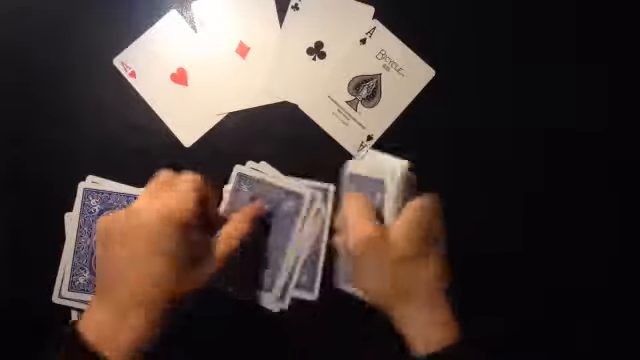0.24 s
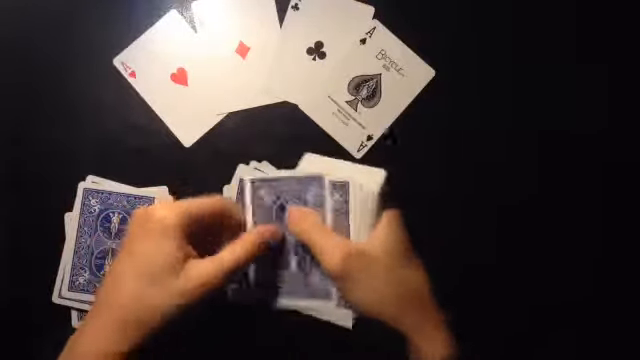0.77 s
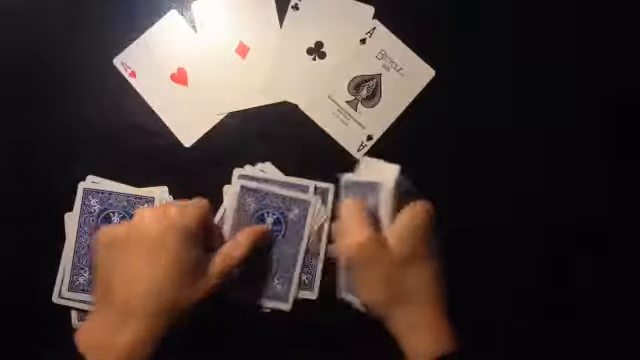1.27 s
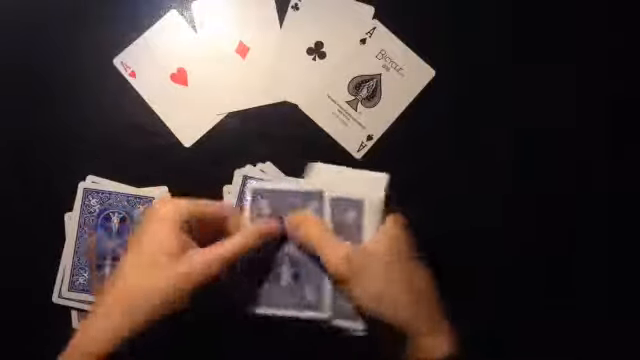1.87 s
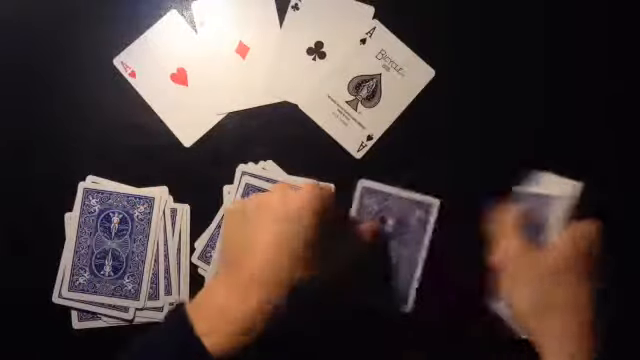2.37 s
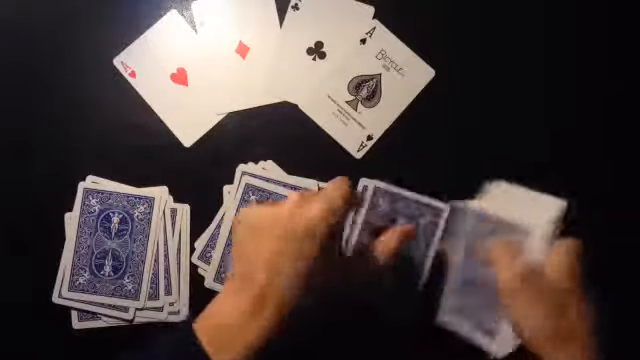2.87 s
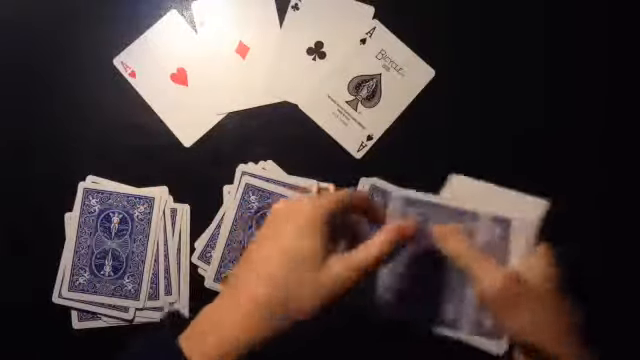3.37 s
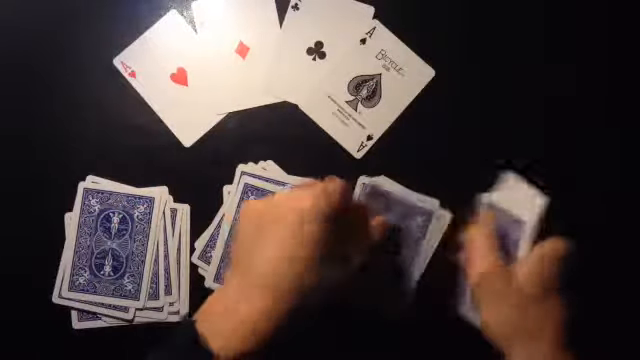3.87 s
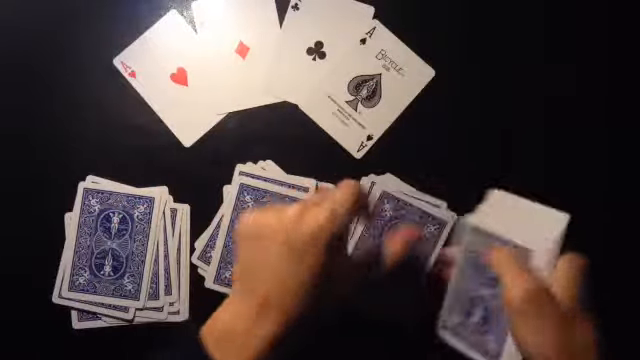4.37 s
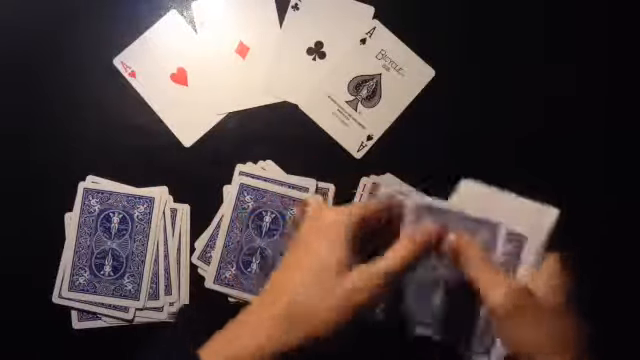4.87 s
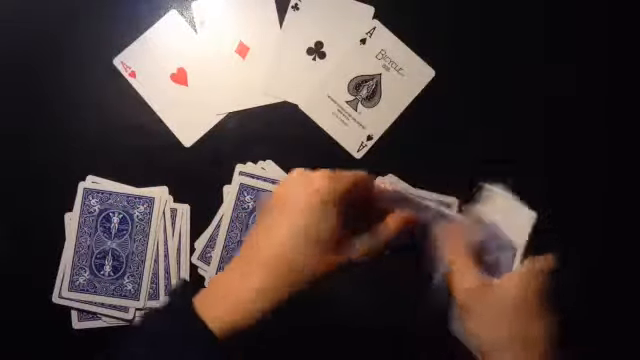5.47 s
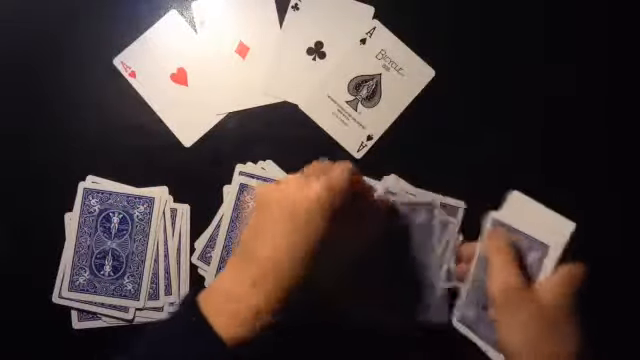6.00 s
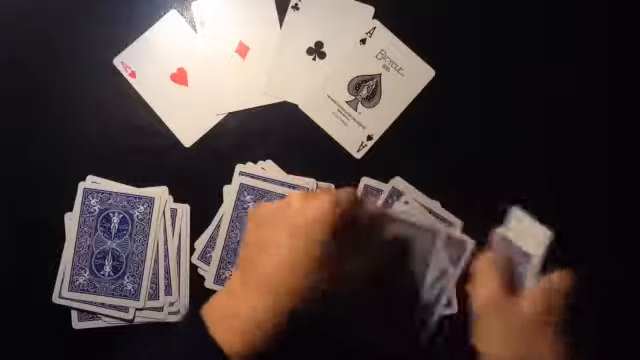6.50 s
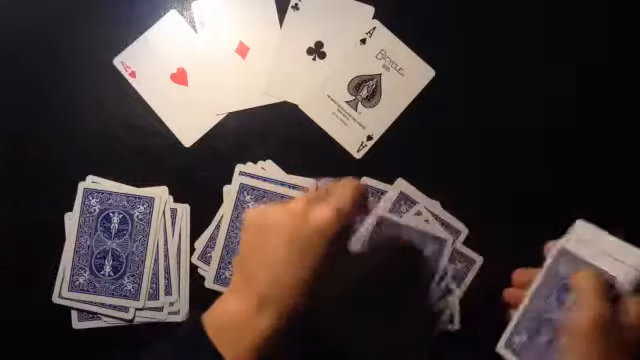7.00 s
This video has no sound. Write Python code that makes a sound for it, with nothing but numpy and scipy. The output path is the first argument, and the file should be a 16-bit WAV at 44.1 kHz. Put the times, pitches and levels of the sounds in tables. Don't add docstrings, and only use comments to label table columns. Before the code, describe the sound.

Playing cards are dealt one after another at a brisk, steady pace, each snapping sharply off the deck and landing with a soft low thump.

```python
import sys
import numpy as np
from scipy import signal
from scipy.fft import rfft, irfft, next_fast_len
from scipy.io import wavfile
from scipy.ndimage import uniform_filter1d

SR = 44100
rng = np.random.default_rng(int(sys.argv[2]) if len(sys.argv) > 2 else 0)


def unload_wav(signal):
    wavfile.write(
        sys.argv[1],
        SR,
        np.round(np.clip(np.atleast_2d(signal).T, -1, 1) * 32767).astype(np.int16),
    )


def invert_db(x):
    u = np.asarray(x, float) / 20
    return 10 ** u


N = 319725
LEAD = 12288
SPAN = 2048

# start_s, peak_db, card_hz, crack_db, room_db
SNAPS = [(0.2264, 4.5, 2360, -35.5, -20.5), (0.5831, -8, 2330, -9, -18), (0.9603, -2.5, 2720, -23.5, -27.5),
         (1.323, 0.5, 2290, -15.5, -19), (1.6778, 0.5, 2770, -34, -19), (2.0204, -17, 3500, -1, -21),
         (2.411, -9.5, 2350, -41, -19), (2.7982, 0, 2157, -28, -19.5), (3.1687, -20.5, 2170, -5.5, -26),
         (3.58, -6.5, 2360, -0.5, -21), (3.9405, -2, 2340, -40.5, -22), (4.3185, -16.5, 1830, -7, -30),
         (4.6996, -2, 2350, -40, -25.5), (5.1043, -10, 2120, -5.5, -25.5),
         (5.5737, -3.5, 2840, -0.5, -26.5), (6.0789, -8, 3500, 3, -25), (6.556, -2, 2660, -3, -20.5),
         (6.9603, -7.5, 2680, -8, -18)]
# peak_db, card_hz, crack_db, room_db
EARLIER_SNAP = (2, 2095.5, -29, -17)
EARLIER_SNAP_S = -0.14
# bend_hz, level_db, width_share
SECOND_BENDS = [(3500, -13.5, 0.42), (3500, -3.5, .3), (3300, -3, 0.33), (3200, -5.5, 0.26),
                (3050, -0.5, 0.38), (3670, 1, 0.17), (2010, -24, 0.13), (3250, 2, 0.54), (4260, -22, 0.12),
                (1590, 2, 0.22), (3790, -5.5, 0.59), (3130, -15, 0.42), (2580, -40, 0.63),
                (1240, -26, 0.22), (4520, -31, 0.25), (4130, -2, 0.92), (2830, 2.5, 0.354), (3470, -4, 0.2),
                (3130, -7, 0.024)]
# length_share, drag_db, second_blow_delay_s, second_blow_db
RELEASES = [(.8, -17, .005, -9), (0.77, -18.5, 0.006, -11.5), (0.44, -6.5, 0.0033, -5),
            (0.2, -16, 0.0048, -11), (0.57, -10.5, 0.004, -8), (0.9, -9.5, .004, -10.5),
            (0.38, -1, 0.0036, 4.5), (0.7, 0.5, 0.0054, -4.5), (0.56, -20, 0.0043, -4.5),
            (0.43, -12, 0.0072, -22), (0.67, -8.5, .005, -16.5), (0.55, -13, 0.0058, -8),
            (0.62, -24, 0.02, -15.5), (0.69, -16, 0.0034, -9.5), (0.43, -13, 0.0028, -7.5),
            (0.48, -8.5, 0.0044, -14), (0.28, -13, 0.0047, -18), (0.76, -11, 0.0091, -11.5),
            (0.25, -17, .004, -0.5)]
# hump_hz, width_share, second_hz, second_db
TAIL_COLOURS = [(2070.0, 0.3, 3100.0, -18.5), (2240.0, 0.39, 4200, 1.5), (2410.0, 0.36, 3180, -14),
                (2410.0, 0.2, 780, -12.5), (2070.0, 0.42, 3900, -3), (2620, 0.5, 3960.0, 3),
                (1910, 0.4, 3000, 10), (2950, 0.36, 2070.0, 0), (2170, 0.51, 3600, -13.5),
                (1550.0, 0.33, 1800, -5), (2120, 0.27, 3960, -1), (2240.0, 0.47, 3570, -4),
                (1380.0, 0.3, 2580.0, -5.5), (2410.0, 0.4, 4900, -23), (4820.0, 0.3, 2200, -8),
                (2410.0, 0.11, 3500, 5.5), (2580.0, 0.203, 3730, 7), (2410.0, 0.065, 3700, -1.5),
                (2450, 0.073, 3330, 2)]
# freq_hz, t60_s
ROOM_DECAY = [(300, 0.35), (1400, 0.53), (3700, 0.41), (7000, 0.24), (12000, 0.15)]
# start_s, peak_db, pitch_hz, half_length_s
PINGS = [(0.2272, -15.5, 1550, 0.0018), (0.2275, -8.5, 4600, 0.0016), (0.2285, -4, 2695, 0.0014),
         (0.2325, -10.5, 3620, 0.0012), (0.5847, -18, 3350, 0.0014), (0.5852, -24.5, 1380.0, 0.0017),
         (0.5857, -15, 2410.0, 0.0022), (0.9618, -22.5, 1450, 0.0017), (1.325, -13, 2410.0, 0.0034),
         (1.3265, -17.0, 4520.0, 0.0014), (1.33, -11.5, 3430, 0.002), (1.6802, -10, 2826, 0.003),
         (2.0249, -20.5, 3500, 0.0039), (2.4135, -13.5, 2060, 0.0022), (2.7996, -5.5, 1880, 0.0012),
         (3.5824, -19.5, 2070, 0.0026), (3.943, -22.5, 4380, 0.0027), (5.1059, -18.5, 2660, 0.0013),
         (5.5748, -12, 7400, 0.0007), (5.5753, -11.5, 4530, 0.00098), (5.5763, -15.5, 2790, 0.0019),
         (6.5566, -19, 4950, 0.0014), (6.5576, -5, 2510, 0.0012), (6.9622, -16.5, 2450.0, 0.0028),
         (6.9627, -20, 3280, 0.0032)]
# start_s, peak_db,
# pitch_hz, half_length_s
CHIRPS = [(0.017, -40.5, 2170, 0.0035), (0.205, -36, 1500, 0.0018), (0.213, -35, 1930, 0.0016),
          (0.571, -39, 2070.0, 0.0048), (0.93, -40.0, 6200.0, 0.0017), (1.738, -45, 1510, 0.0028),
          (2.002, -54, 1590.0, 0.002), (2.026, -26, 4840, 0.0019), (2.054, -36, 5840, 0.0019),
          (2.4241, -22.5, 7400, 0.00098), (2.425, -32, 4520.0, 0.0023), (2.816, -27.5, 2410, 0.0042),
          (2.8565, -37, 5000, 0.0019), (3.1538, -42, 2075, 0.0055), (3.543, -42.5, 1700, 0.0038),
          (3.573, -34, 2250, 0.002), (3.865, -40, 5680.0, 0.00086), (3.9515, -33.0, 7350, 0.0012),
          (4.289, -32.5, 1470, 0.0018), (4.308, -31, 2100, 0.002), (4.334, -40, 1950, 0.0034),
          (4.701, -29.0, 5020, 0.0015), (4.702, -32, 4520.0, 0.0012), (4.7245, -32, 2360, 0.0051),
          (4.733, -28.5, 6200.0, 0.001), (5.055, -36, 3480, 0.0019), (5.0558, -33, 1390, 0.0023),
          (5.069, -36, 3620, 0.0031), (5.07, -34, 2650, 0.0033), (5.1526, -31, 4820.0, 0.0023),
          (5.1553, -33, 2330, 0.0013), (5.539, -34, 1520, 0.0014), (5.553, -29, 2080, 0.003),
          (5.567, -32, 7700, 0.00083), (6, -43, 4570.0, 0.0013), (6.054, -40, 2360, 0.0031),
          (6.079, -12.5, 3600, 0.0006), (6.534, -38, 1680, 0.0045), (6.55, -40, 2460, 0.005),
          (6.56, -39, 2420, 0.0034), (6.935, -32, 2020, 0.0035), (6.977, -30, 2450, 0.0043)]
# start_s, peak_db, card_hz
TOUCHES = [(0.1077, -41, 1930), (0.124, -38, 2800), (0.462, -31.5, 3500), (0.8415, -38, 3600),
           (1.1724, -30, 3700), (1.2017, -37, 3500), (1.2346, -32.5, 3530), (1.9217, -30.5, 1480),
           (2.3023, -31, 3830), (2.6959, -35, 1480), (3.073, -47.5, 1260), (3.0855, -34, 3630),
           (3.475, -31.5, 3670), (3.4932, -28, 6100), (3.8211, -43, 2070), (3.8606, -26, 2620),
           (4.22, -46.5, 2160), (4.2344, -33.5, 1770), (4.6086, -35.5, 2060), (4.928, -34.5, 4760),
           (4.949, -44.5, 2000), (5.4255, -33.5, 3000), (5.449, -37, 1590), (5.46, -39.5, 2490),
           (5.47, -43.5, 3300), (5.851, -34, 1220), (6.4083, -34, 1240), (6.8265, -42, 4120),
           (6.848, -38, 2160), (6.878, -52.5, 3500)]
# crack_db, low_db, t60_s, width_share
TOUCH_COLOUR = (-1.5, -6, .0085, .5)
# start_s, peak_db, card_hz, crack_db
SNAGS = [(0.9084, -34, 4100, 8.5), (1.9412, -31.5, 4130, -4), (2.772, -27, 1686, -15),
         (3.142, -31.5, 1590, -17), (3.529, -35.5, 4230, -0.5), (3.5564, -29, 2190, -1.5),
         (3.918, -28.5, 2100, -10.5), (4.297, -23, 2020, -28), (4.303, -22, 2000, -33),
         (4.6716, -18, 2080, -3.5), (5.0063, -29, 2740, -1), (5.0192, -25, 3520, -10),
         (5.0734, -17.5, 1720, -19), (5.521, -39, 1600, -17), (5.5481, -17, 2040, -29.5),
         (5.9972, -26, 2170, -9.5), (6.0324, -45, 2290, -21.5), (6.5301, -25.5, 2520, -19),
         (6.9275, -27, 2080, 3)]
# low_db, t60_s, width_share
SNAG_COLOUR = (-16, .015, .26)
# start_s, peak_db, card_hz, crack_db
CATCHES = [(0.2186, -14.5, 2350, -16), (0.5713, -19, 4020, -24), (0.9523, -26, 4720, 11.5),
           (1.3163, -18, 4530, -10.5), (1.6712, -23, 2850, -13), (2.0117, -20, 3870, -6),
           (2.0187, -16.5, 2090, -26.5), (2.403, -26, 2510, 1), (3.5738, -34, 2180, -11.5),
           (3.9323, -25, 2170, -14), (4.6898, -25, 2830, -24), (5.097, -26, 2340, -10),
           (6.07, -35, 3050, -1), (6.952, -26.5, 2790, -24)]
# low_db, t60_s, width_share
CATCH_COLOUR = (-11, .017, .28)
# start_s, peak_db, card_hz, crack_db
PATS = [(0.9675, -15.5, 2450, -6.5), (0.99, -21.5, 3060, -1.5), (1.3551, -20, 3200, -1.5),
        (1.705, -28.5, 2625, -16), (2.4241, -16, 4070, 2), (2.8549, -29.5, 4870, -12.5),
        (3.9506, -15, 2350, 2), (4.7157, -17, 4470, 2.5), (4.7396, -21, 6200, -21),
        (5.137, -29.5, 4800, -7.5), (5.1517, -30.5, 4700, 10.5), (5.157, -29.5, 2340, 2),
        (4.338, -26, 4350, -6), (6.0975, -28.5, 3500, 8), (6.9875, -24, 3330, -1)]
# low_db, t60_s, width_share
PAT_COLOUR = (-11.5, .017, .31)
# fastest_s, rise_s, hiss_db, body_db, body_hz
SLIDES = [(0.2, 0.022, -42.5, -43.5, 1590), (0.56, 0.017, -43.5, -59, 4210), (0.935, 0.019, -40, -55, 2040),
          (1.289, 0.039, -49, -47, 2240), (1.648, 0.02, -41, -47, 4000), (1.998, 0.017, -47.5, -39, 1550),
          (2.384, 0.029, -45.5, -43.5, 1745), (2.781, 0.03, -43, -35, 1704), (3.147, 0.029, -50, -51, 1607),
          (3.556, 0.02, -46.5, -41, 2094), (3.91, 0.013, -41, -35.5, 1808), (4.295, 0.021, -50, -40, 1550),
          (4.664, 0.019, -37, -32, 2157), (5.072, 0.028, -38, -30.5, 2150),
          (5.55, 0.039, -54.5, -31.5, 1949), (5.921, 0.028, -44.5, -51.5, 2006),
          (6.046, 0.017, -55.5, -44.5, 2840), (6.532, 0.037, -49, -39, 2245),
          (6.934, 0.041, -46.5, -39.5, 1885)]
# fastest_s, fall_s, hiss_db, body_db, body_hz
SKIDS = [(0.248, 0.077, -56, -57, 3630), (0.615, 0.012, -51, -74, 2440), (0.991, 0.0043, -52, -41, 2810),
         (1.356, 0.0035, -36, -42, 3200), (1.699, 0.015, -63, -32, 2710), (2.054, 0.0097, -42.5, -41, 3300),
         (2.434, 0.0081, -36.5, -34.5, 3670), (2.856, 0.0039, -46, -43, 2126),
         (3.194, 0.0048, -49, -46, 2110), (3.603, 0.041, -46.5, -47.5, 2400),
         (3.964, 0.031, -73, -52, 3130), (4.34, 0.017, -49, -48.5, 2010), (4.739, 0.0032, -43, -45.5, 3670),
         (5.154, 0.0049, -41, -43, 4440), (5.594, 0.036, -37, -61, 2440), (6.101, 0.036, -44.5, -57, 3960),
         (6.576, 0.053, -50, -42, 2280), (6.991, 0.004, -43, -46.5, 2410)]
# freq_hz, level_db_per_hz
HISS_SPECTRUM = [(410, -46.5), (700, -19), (1840, -7), (2080, -2.5), (2630, -5), (7390, -5.5), (14800, -21),
                 (16000, -29)]
# start_s, peak_db, knock_hz, t60_s
SLAPS = [(0.225, -32.5, 358, .03), (.961, -35.5, 422, 0.042), (6.08, -36.5, 485, 0.02),
         (.569, -42.5, 693, 0.009), (.584, -28.5, 796, .02), (3.213, -43.5, 577, 0.029),
         (4.352, -35, 844, 0.023), (4.699, -24.5, 767, .02), (5.136, -38, 830, .025),
         (5.574, -34, 607, 0.028), (5.595, -36.5, 875, 0.058), (6.556, -27.5, 655, 0.0094)]
# start_s, peak_db, knock_db, rebound_db
LANDINGS = [(0.256, -26, -37.5, -49), (0.6267, -26.5, -37, -33.5), (1.0005, -33, -45.5, -37),
            (1.367, -32, -31, -41), (1.69, -31, -31, -31.5), (2.051, -24.5, -38.5, -48),
            (2.4538, -27.5, -36, -38), (2.8296, -37.5, -41, -56), (3.224, -32, -40.5, -50.5),
            (3.611, -34, -33.5, -35.5), (3.9736, -27, -34, -28), (4.359, -26, -26, -35.5),
            (4.7505, -32, -33.5, -40), (5.147, -26.5, -35, -42), (5.606, -21, -28, -31),
            (6.1226, -33, -36, -42), (6.619, -42, -41, -48), (6.9955, -29.5, -35, -61)]
# start_s, peak_db, knock_db
EARLIER_THUMP = (-.1, -27, -44)
# start_s, peak_db, knock_db
JOLTS = [(0.2357, -37, -44), (0.5943, -37.5, -36.5), (0.97, -30.5, -41), (1.3286, -44, -30.5),
         (1.3417, -35, -33), (1.7205, -53, -33), (2.03, -36, -31), (2.417, -42, -35.5),
         (2.798, -45.5, -30.5), (3.175, -49, -44), (3.946, -49, -29), (4.322, -54, -34.5),
         (4.715, -41.5, -33), (5.077, -50, -31.5), (5.167, -39, -38), (5.593, -35, -27), (6.0888, -36, -29),
         (6.577, -40, -43)]
# delay_s, signed_gain
TABLE_ECHOES = [
    (.034, 0.025),
    (.048, -.16),
    (.063, .05),
    (0.074, .08),
    (.1, 0.057),
]
# mode_hz, level_db, t60_s
TABLE_MODES = [(165.6, 4, 0.08), (248, -4.5, 0.031), (336, -6.5, 0.081), (61, -14.5, 0.14),
               (45, -29.5, .15)]
# freq_hz, level_db_per_hz
AIR_SPECTRUM = [(15, -41), (25, -6), (102, 2.5), (344, -5.5), (405, -9.5), (754, -2), (1130, -9.5),
                (2410, -10.5), (2990, -12.5), (3620, -7.5), (5430, -12.5), (14400, -19), (16000, -26.5)]
# time_s, level_db
AIR_DRIFT = [(0, -1), (.5, -6), (1, -3), (1.499, -1.5), (2, -3), (2.501, -2.5), (3.002, -3.5),
             (3.401, -6.5), (3.8, -2.5), (4.199, -2), (4.549, -4), (5, -3.5), (5.399, 0), (5.8, -0.5),
             (6.3, -3.5), (6.799, -1.5), (7.25, -3)]
# freq_hz, level_db
MIC_TOP = [(14800, 0.5), (15300, -7), (15800, -27.5), (16400, -38), (16600, -99.5)]


def unit(x):
    return x / np.sqrt(np.mean(x ** 2) + 1e-20)


def top(x):
    return x / np.abs(x).max()


def along(points, hz):
    f, value = np.transpose(points)
    return np.interp(np.log(hz + 1), np.log(f + 1), value)


def filtered(x, response):
    m = next_fast_len(len(x) + SPAN)
    return irfft(rfft(x, m) * response(np.fft.rfftfreq(m, 1 / SR)), m)[:len(x)]


def peak(f, hz, width_hz):
    return 1j * f * width_hz / (hz * hz - f * f + 1j * f * width_hz + 1e-9)


def patchy(x, depth_db):
    z = signal.stft(x, nperseg=512)[2]
    field = uniform_filter1d(rng.standard_normal(z.shape), size=5, axis=0)
    field = uniform_filter1d(field, size=7, axis=1)
    return signal.istft(z * invert_db(depth_db * unit(field)), nperseg=512)[1][:len(x)]


def silence():
    return np.zeros(N + LEAD + SR)


def add(track, s, sound):
    at = LEAD + round(s * SR)
    track[at:at + len(sound)] += sound


def contact(hz, crack_db, low_db, t60, second_hz, second_db, narrow, attack, broad_db, drag_db):
    t = np.arange(SPAN) / SR
    ring_noise, crack_noise, low_noise, grain = rng.standard_normal((4, SPAN))
    crack_noise = crack_noise * invert_db(7.3 * unit(uniform_filter1d(grain, size=12)))

    def decay(t60_s, rise_s):
        return invert_db(-60 * t / t60_s) * (1 - np.exp(-t / rise_s)) ** 2

    def bend(f, centre):
        return peak(f, centre, centre * narrow) ** 2

    def card(f):
        return bend(f, hz) + invert_db(second_db) * bend(f, second_hz) + invert_db(broad_db) * peak(f, 2380, 1900) ** 2

    ring = filtered(ring_noise, card)
    ring = ring / np.abs(uniform_filter1d(ring ** 2, size=60)) ** 0.3
    blow = invert_db(-60 * (t / (0.7 * t60)) ** 1.4) * (1 - np.exp(-t / attack)) ** 2
    body = top(ring * (blow + invert_db(drag_db) * decay(0.065, 0.0025)))
    spikes = decay(1.9 * t60, 0.0002) + 1.6 * decay(0.005, 0.0001) + invert_db(-31) * decay(0.22, 0.002)
    crack = top(filtered(crack_noise * spikes, lambda f: peak(f, 6900, 5200) ** 2))
    low = top(filtered(low_noise * decay(1.5 * t60, attack), lambda f: peak(f, 618, 950) ** 2))
    return body + invert_db(crack_db) * crack + invert_db(low_db) * low


def room_tail():
    hz, t, z = signal.stft(rng.standard_normal(SR // 2), SR, nperseg=256)
    tail = signal.istft(z * invert_db(-60 * t / along(ROOM_DECAY, hz)[:, None]), SR, nperseg=256)[1]
    t = np.arange(len(tail)) / SR
    tail *= np.clip(t / 0.0044, 0, 1)
    tail *= 1 - 0.39 * np.exp(-(t / 0.025) ** 2 / 2)
    tail *= 1 + 0.16 * np.exp(-0.5 * ((t - 0.047) / 0.026) ** 2)
    return tail / np.linalg.norm(tail)


def tail_colour(f, hz, narrow, second_hz, second_db):
    def hump(centre, width_hz):
        return np.abs(peak(f, centre, width_hz)) ** 4

    power = hump(hz, narrow * hz) + 0.47 * hump(hz, 230)
    power = power + invert_db(2 * second_db) * hump(second_hz, narrow * hz)
    power = power + invert_db(2 * -9.5) * hump(2400, 2600)
    power = power + invert_db(2 * -19.5) * hump(6500, 7700)
    power = power + invert_db(2 * -20) * (hump(700, 800) + 7 * hump(720, 130))
    return np.sqrt(power)


def snaps():
    track, walls = silence(), silence()
    f = np.fft.rfftfreq(SPAN, 1 / SR)
    rows = [(EARLIER_SNAP_S, *EARLIER_SNAP), *SNAPS]
    for snap, bend, colour, release in zip(rows, SECOND_BENDS, TAIL_COLOURS, RELEASES):
        s, db, hz, crack_db, room_db = snap
        share, drag_db, delay_s, again_db = release
        t60 = share * 0.024 * np.exp(-0.1023 * db)
        low_db = -26 - 0.86 * db
        first, second = (contact(hz, crack_db - less_db, low_db, t60, *bend, attack=0.00094,
                                 broad_db=-5, drag_db=drag_db) for less_db in (0, 4))
        add(track, s, invert_db(db - 4) * first)
        add(track, s + delay_s, invert_db(db - 5.5 + again_db) * second)
        gain = invert_db(db - 3 + room_db) * np.linalg.norm(first)
        gain /= np.sqrt(np.mean(tail_colour(f, *colour) ** 2))
        add(walls, s, gain * filtered(room_tail(), lambda f: tail_colour(f, *colour)))
    return track + patchy(walls, depth_db=1.6)


def pings():
    track, t = silence(), np.arange(-SPAN // 2, SPAN // 2) / SR
    glide_per_s = 5.5
    for s, db, hz, half_s in [*PINGS, *CHIRPS]:
        grain = unit(uniform_filter1d(rng.standard_normal(SPAN), size=50))
        turn = 2 * np.pi * (hz * (t + glide_per_s * t * t / 2) + rng.random())
        turn = turn + 200 * half_s * grain
        swell = np.exp(-0.5 * (t / (half_s * np.where(t < 0, 0.75, 1.2))) ** 2)
        add(track, s + t[0], invert_db(db - 1 + 730 * half_s * grain[::-1]) * np.cos(turn) * swell)
    return track


def ticks():
    track = silence()
    kinds = [(TOUCHES, TOUCH_COLOUR), (SNAGS, SNAG_COLOUR), (CATCHES, CATCH_COLOUR), (PATS, PAT_COLOUR)]
    for rows, (*kind, narrow) in kinds:
        for s, db, *card in rows:
            click = contact(*card, *kind, second_hz=1730, second_db=-7, narrow=narrow,
                            attack=0.00025, broad_db=-15, drag_db=-19)
            add(track, s - 0.0006, invert_db(db - 5) * click)
    return track


def rubs():
    track, t = silence(), np.arange(-2 * SPAN, 2 * SPAN) / SR
    slide_fall_s, skid_rise_s = 0.016, 0.0075
    strokes = [(s, rise, slide_fall_s, *rest) for s, rise, *rest in SLIDES]
    strokes += [(s, skid_rise_s, *rest) for s, *rest in SKIDS]
    for s, rise, fall, hiss_db, body_db, hz in strokes:
        hiss_noise, b, c, grain = rng.standard_normal((4, len(t)))
        speed_db = -8 * np.abs(t / np.where(t < 0, rise, fall))
        rough = invert_db(0.73 * unit(uniform_filter1d(grain, size=40)))
        hiss = unit(filtered(hiss_noise * rough, lambda f: invert_db(along(HISS_SPECTRUM, f))))
        turn = 2 * np.pi * np.cumsum(hz * np.exp(8 * np.clip(t, -0.018, 0.02))) / SR
        b, c = (filtered(v, lambda f: 1 / (1 + (f / (0.3 * hz)) ** 4)) for v in (b, c))
        slow = uniform_filter1d(uniform_filter1d(grain[::-1], size=110), size=110)
        lumps = invert_db(3 * unit(slow))
        bending = b * np.cos(turn) + c * np.sin(turn)
        overtones = c * np.cos(2.6 * turn) - b * np.sin(2.1 * turn)
        body = unit(rough * lumps * (bending + 0.5 * overtones))
        stroke = invert_db(hiss_db - 0.7 + speed_db) * hiss + invert_db(body_db - 4.5 + 3 * speed_db) * body
        add(track, s + t[0], stroke)
    return track


def slaps():
    track, t = silence(), np.arange(SPAN) / SR
    for s, db, hz, t60 in SLAPS:
        puff = rng.standard_normal(SPAN) * invert_db(-60 * t / t60) * (1 - np.exp(-t / 0.00055))
        add(track, s, invert_db(db) * top(filtered(puff, lambda f: peak(f, hz, 0.21 * hz) ** 2)))
    return track


def table():
    track, t = silence(), np.arange(-SPAN // 2, 7 * SPAN // 2) / SR
    swing_hz, swing_scatter, echo_scatter = 113.5, 0.02, 0.21
    rebound_s, rebound_knock_db = 0.0125, -5.5

    def swing(u, pitch_hz):
        return np.cos(2 * np.pi * pitch_hz * u) * np.exp(-0.5 * (u / np.where(u < 0, 0.007, 0.0095)) ** 2)

    mode_hz, level_db, t60 = np.transpose(TABLE_MODES)[:, :, None]
    since = np.clip(t + 0.0053, 0, None)
    rebounds = [(s + rebound_s, db, knock_db + rebound_knock_db) for s, _, knock_db, db in LANDINGS]
    for s, db, knock_db, *_ in [EARLIER_THUMP, *LANDINGS, *rebounds, *JOLTS]:
        scatter, phase = rng.standard_normal((2, len(TABLE_MODES), 1))
        shift, *uneven = rng.standard_normal(1 + len(TABLE_ECHOES))
        pitch_hz = swing_hz * np.exp(swing_scatter * shift)
        thump = swing(t, pitch_hz)
        for (delay_s, gain), u in zip(TABLE_ECHOES, uneven):
            thump = thump + gain * (1 + echo_scatter * u) * swing(t - delay_s, pitch_hz)
        modes = np.sin(2 * np.pi * mode_hz * since + 3 * phase)
        modes = modes * invert_db(level_db + 3.3 * scatter - 60 * since / t60)
        knock = modes.sum(0) * (1 - np.exp(-since / 0.0044))
        add(track, s + t[0], invert_db(db) * thump + invert_db(knock_db - 3.5) * knock)
    return track


def air():
    drift_db = np.interp(np.arange(N) / SR, *np.transpose(AIR_DRIFT))
    noise = patchy(rng.standard_normal(N), depth_db=2)
    noise = filtered(noise, lambda f: invert_db(along(AIR_SPECTRUM, f)) * f / (f + 40))
    return invert_db(-60 + drift_db) * unit(noise)


def scene():
    def near(f):
        reflection = 1 + 0.038 * np.exp(-2j * np.pi * f * 0.0029)
        return reflection * (1 + 0.26 * peak(f, 2450, 160))

    small = ticks() + rubs()
    echo = invert_db(-13.5) * signal.fftconvolve(small, room_tail())[:len(small)]
    cards = filtered(snaps() + small + echo + slaps() + pings(), near)
    return ((cards + table())[LEAD:LEAD + N] + air())[None]


def band_limit(x):
    return signal.sosfilt(signal.butter(12, 16500, fs=SR, output="sos"), x)


def record(dry):
    ceiling = 0.88
    x = dry[0] / (1 + np.abs(dry[0] / ceiling) ** 16) ** (1 / 16)
    x = filtered(x, lambda f: invert_db(along(MIC_TOP, f)))
    return band_limit(x[None])


dry = scene()
out = record(dry)
unload_wav(out)
```